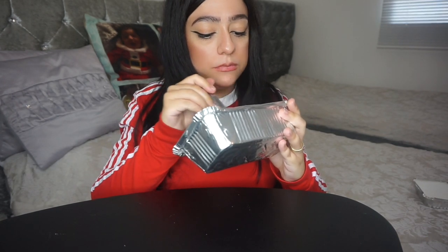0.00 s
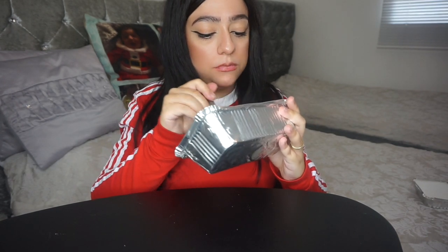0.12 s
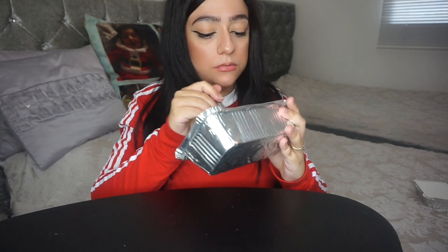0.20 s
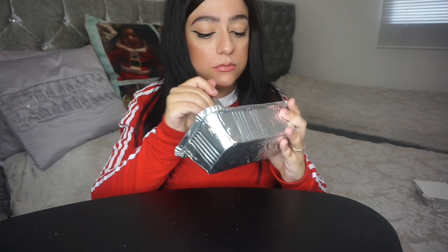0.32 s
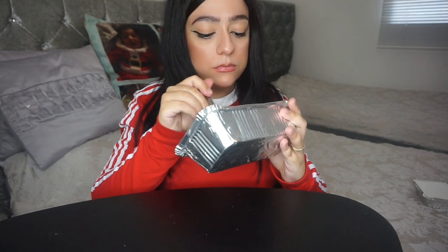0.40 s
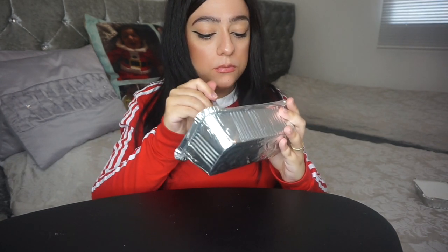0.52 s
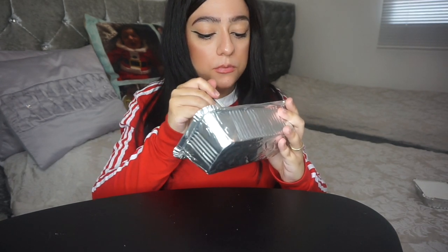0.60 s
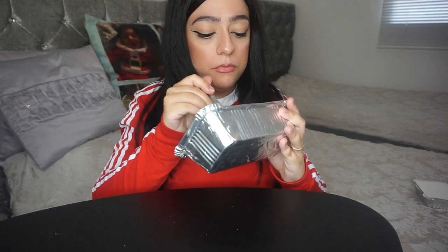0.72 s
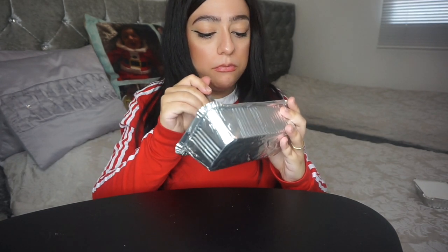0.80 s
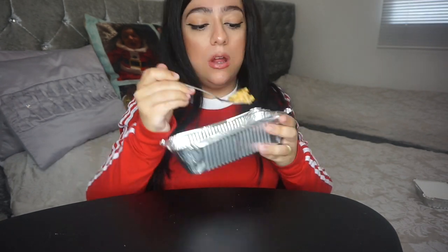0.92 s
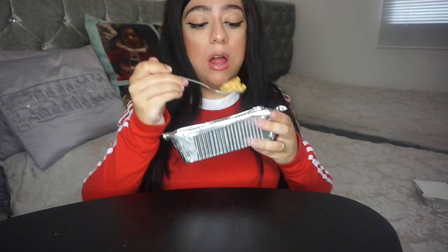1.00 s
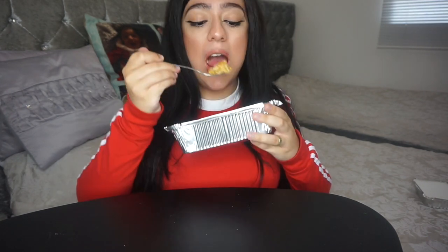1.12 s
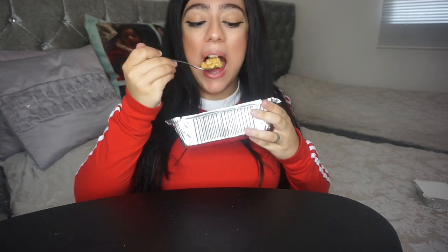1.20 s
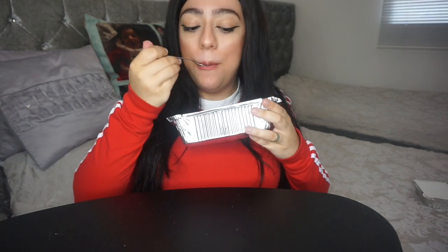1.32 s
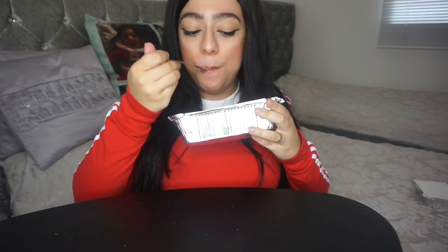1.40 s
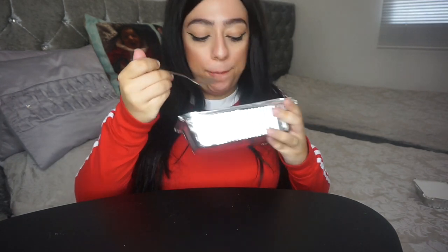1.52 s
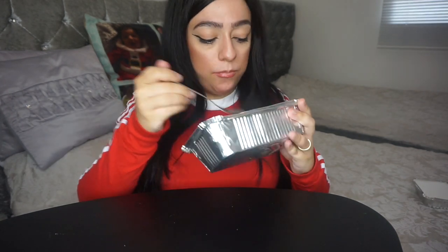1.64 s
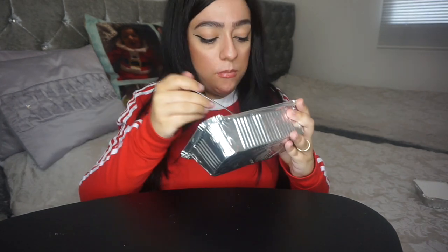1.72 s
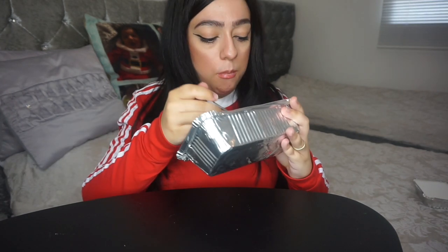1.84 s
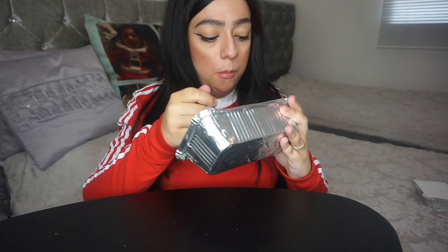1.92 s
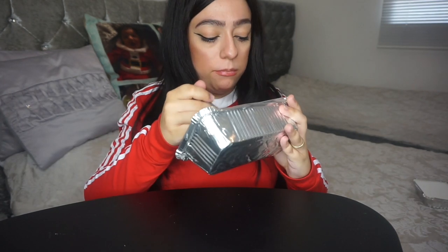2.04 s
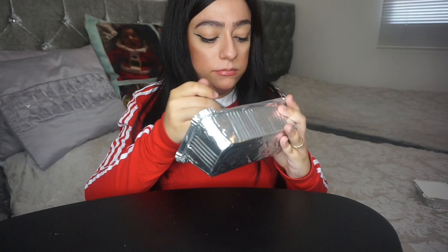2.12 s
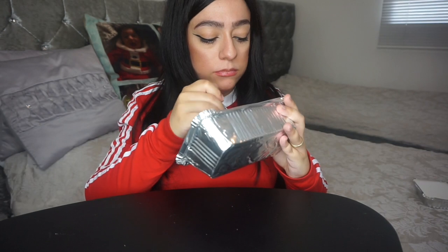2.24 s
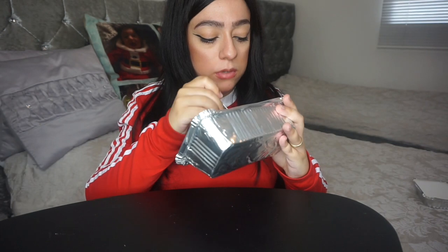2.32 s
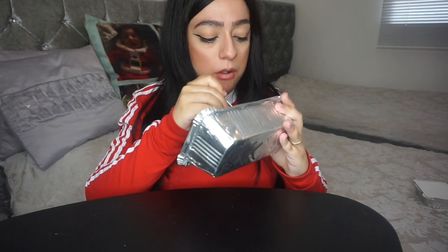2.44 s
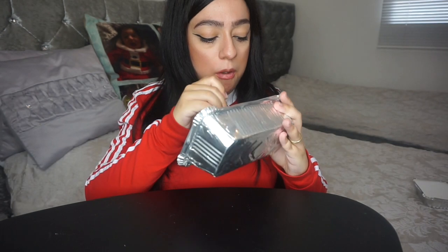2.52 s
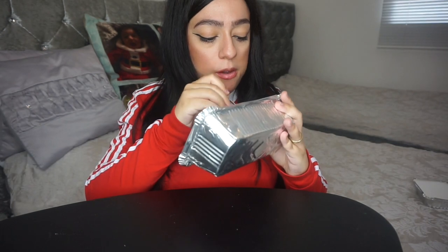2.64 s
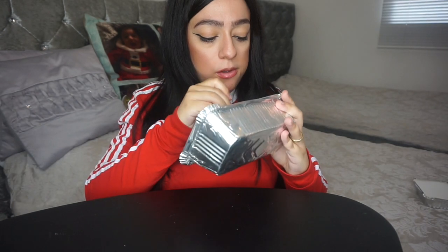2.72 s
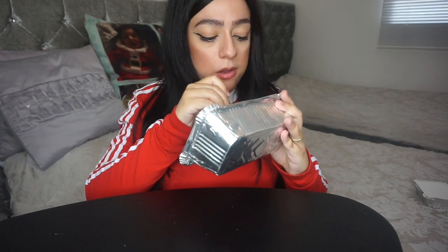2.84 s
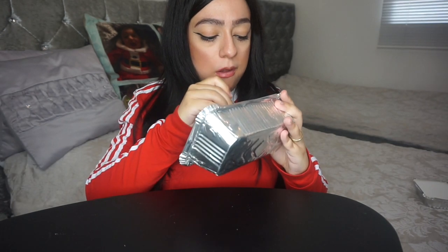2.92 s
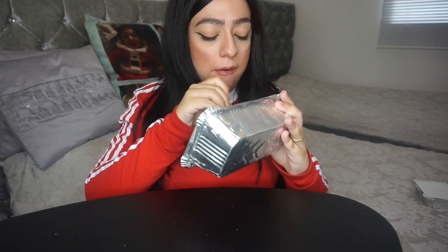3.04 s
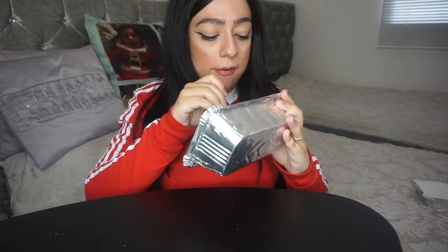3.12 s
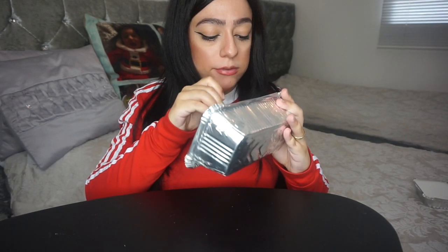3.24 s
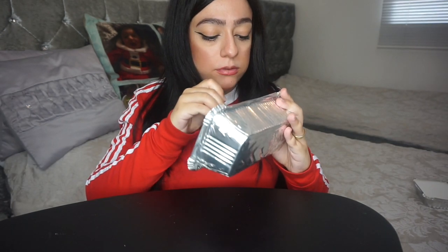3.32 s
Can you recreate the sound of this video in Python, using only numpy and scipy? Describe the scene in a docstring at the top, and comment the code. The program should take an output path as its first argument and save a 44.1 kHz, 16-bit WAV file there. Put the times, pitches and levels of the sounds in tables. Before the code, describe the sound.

A metal fork knocks and scrapes inside a thin foil tray, a busy cluster first, then a soft rub and a long pause, then spaced scoops; close stereo microphone in a small furnished room.

```python
"""Fork tines scrape and knock inside a hand-held aluminium foil tray, in a small furnished room.
Scrapes are clumps of stick-slip clicks and knocks are brief crushes; both drive resonances of the thin foil.
Between two scoops a band of noise rubs as the fork is drawn out with a mouthful, and the hand takes a new grip.
Moist food ticks now and then, and two lone tones ring out of the tray. The direct sound sits a little
to the right of the stereo microphone, with a short room ring, a dull late tail and quiet steady air."""
import sys
import numpy as np
from scipy import signal
from scipy.fft import rfft, irfft
from scipy.io import wavfile
from scipy.ndimage import map_coordinates

SR = 44100
rng = np.random.default_rng(int(sys.argv[2]) if len(sys.argv) > 2 else 0)


def transcribe(u):
    """Save the signal u as a 16-bit wav file named by the first command-line argument.

    u: samples, shape (n,) or (channels, n), limited to [-1, 1]; the rate is SR.
    q: integer samples, one column per channel.
    """
    v = np.clip(np.atleast_2d(u).T, -1, 1)
    q = np.round(v * 32767).astype(np.int16)
    wavfile.write(sys.argv[1], SR, q)


N = 147735   # length in samples
SIZE = 16384   # samples given to one contact
CUTOFF_HZ = 15750

# Steady air of the room. Each row: frequency in Hz, level in dB.
AIR_SPECTRUM = [(25,-6.5), (50,-4), (300,4), (1100,-5), (1800,-4.5), (3000,-13), (7000,-18), (16000,-16)]
AIR_DB, AIR_SIDE_DB = -55, -11   # the side level is relative to the middle

# Tone of the reverberation in the middle. Each row: frequency in Hz, gain in dB.
ROOM_COLOUR = [(150, -3.5), (1000, -4.5), (3000, -5), (6000, 7.5), (14000, -4)]
# Tone of the reverberation at the sides. Each row: frequency in Hz, gain in dB.
SIDE_COLOUR = [(200,-8.5), (1000,-4), (3000,-2.5), (5500,11), (9000,2), (15000,-9)]
# Balance at the microphone. Each row: frequency in Hz, left over right in dB.
LEFT_OVER_RIGHT = [(200,-0.3), (600,-2.5), (5000,-2), (12000,0.1)]
RIGHT_LAG_S = .000007
ROOM_GAP_S = 0.00535   # silence before the first reflection
ROOM_T60_S, ROOM_DB = 0.25, -7   # short ring, before its colour
LATE_T60_S, LATE_DB = 0.77, -10   # late tail, before damping and colour
LATE_DAMPING_HZ = 2500   # bedding soaks up the treble of the late tail
SWAY_HZ = 4   # the tray moves in the hand

# Small sticky ticks of food. Each row: start in seconds, level in dB.
FOOD_TICKS = [(.052,-44.5), (1.183,-43), (1.5085,-44.5), (3.162,-46)]
TICK_HZ = 12800

# The fork rubs as it is drawn out with the food. One row: release in seconds, swell in dB, level in dB.
RUB_STROKE = (0.065, 9.4, -24)
# Spectrum of the rub. Each row: frequency in Hz, gain in dB.
RUB_SPECTRUM = [(80,-48), (250,-15.5), (380,-4.5), (540,2.5), (950,2), (1400,-9), (2900,-7), (8200,-27.5),
                (12500,-17.5), (16000,-24)]
# Resonances in the rub. Each row: frequency in Hz, width in Hz, boost in dB.
RUB_RINGS = [(1504, 18, 16.7), (2830, 54, 4.1), (4300, 140, 3.9), (950, 70, 1.7)]
RUB_START_S, RUB_RISE_S = 1.0455, .042

# A thin metallic ring after a hard tap, and a boom of the tray's floor.
# Each row: start in seconds, frequency in Hz, fall by 60 dB in seconds, level in dB.
LONG_RINGS = [(.32, 1402, 0.35, -34), (1.98, 221.4, 0.35, -35)]
RING_ATTACK_S = .012

# Registers in which a contact is levelled: bass, middle, rattle, treble. Each row: lowest Hz, highest Hz.
REGISTERS_HZ = [(150, 760), (760, 1380), (1500, 4500), (5200, 16000)]
# The tines knock on the foil. Each row: start in seconds, bass, middle, rattle and treble levels in dB,
# pitch of the crease (the bite) in Hz.
KNOCKS = [(.196,-28,-36,-30.5,-46,2840), (.2005,-29.5,-31,-29.5,-52,1900), (.261,-40,-65,-26.5,-27,4000),
          (.3198,-25,-21,-24,-40,3180), (.3265,-31,-21,-22.5,-73,1930), (.539,-36,-24,-26,-27,3640),
          (.6116,-29.5,-41,-20.5,-30.5,3200), (.6219,-37,-28,-23.5,-37,3360),
          (.6378,-37,-31,-21.5,-37,3180), (.6491,-28,-20,-17,-36,2910), (.677,-34.5,-38,-26,-59,2900),
          (.829,-68,-73,-45.5,-64,1900), (.897,-51,-48.5,-64,-65,1800), (1.005,-49.5,-51,-55,-80,2210),
          (1.9799,-38.5,-33.5,-37.5,-54,3780), (2.253,-40,-31,-36,-48,2950),
          (2.2887,-40,-45,-32.5,-53,3360), (2.3213,-32.5,-33,-31,-39,3380),
          (2.3335,-35.5,-30.5,-31.5,-47,2340), (2.5306,-34.5,-50,-27,-54,3030),
          (2.5704,-32,-34,-28.5,-43,3200), (2.7963,-36.5,-52,-39.5,-46,2870),
          (2.8127,-31,-35.5,-32,-43.5,3660), (2.8251,-40,-24,-31,-42.5,2560),
          (3.034,-28.5,-35.5,-30,-40,3900), (3.0399,-27,-18.5,-27,-39.5,3700),
          (3.043,-33.5,-20,-31.5,-53,3950), (3.3448,-45.5,-39.5,-38.5,-43.5,2880)]
# The tines scrape. Each row: start in seconds, push in seconds, release in seconds, swell in dB
# (negative sinks instead), bass, middle, rattle and treble levels in dB, pitch of the crease in Hz.
SCRAPES = [(-.01,0.0099,0.13,-19.5,-38.5,-38.5,-35.5,-39,2580),
           (.21,0.071,0.11,5,-47.5,-39.5,-37.5,-45,3750), (.54,0.13,0.061,6,-30.5,-25,-29.5,-38.5,2950),
           (1.981,0.058,0.08,-1.5,-39,-37,-40,-45,2830), (2.255,0.07,0.083,9.5,-41,-39.5,-38,-51.5,2440),
           (2.539,0.04,0.091,-1,-33.5,-35,-32.5,-43,3160), (2.799,0.031,0.086,15,-36,-32.5,-34,-46,2800),
           (3.04,0.044,0.072,2,-40,-31.5,-35,-45.5,3700)]
# Resonances of the tray. Each row: frequency in Hz, width in Hz, boost in the first grip in dB,
# boost in the second grip in dB.
TRAY_MODES = [(220.4,26,16,5.5), (316.6,34,8.5,-1.5), (386.7,63,15,1.5), (518.6,12.5,12.5,1), (572,130,4,4),
              (767,34,8,0.5), (878,36,7,6.5), (1012,36,0,8), (1082,48,8.5,7), (1212,33,6,13),
              (1390,78,3,-15), (1930,81,5.5,1)]
# Broad response of the foil. Each row: frequency in Hz, gain in dB.
FOIL_RESPONSE = [(60,-34.5), (130,-13), (230,-6), (550,0), (1100,0), (2300,-1), (3600,-5), (4600,-12.5),
                 (6200,-19), (13500,-10.5), (16000,-18.5)]
REGRIP_S = 1.5   # contacts from here on meet the second grip
FLEX = .012   # the foil bends: random shift of its resonances at each touch, as a share of the pitch
SHEET_T60_S, SHEET_DB = 0.067, -2   # dense shimmer of the whole sheet, before the foil response
KNOCK_LENGTH_S = 0.0065   # span over which the level of a knock is reckoned
CRUSH_S, CRUSH_DB = 0.0017, 2   # nominal decay time constant of the crackle, level against the click
BITE_WIDTH_HZ, KNOCK_BITE_DB, SCRAPE_BITE_DB = 320, 12, 2.5
SLIPS_PER_S, SLIP_SPREAD_DB = 2600, 2.5
CATCH_S, CATCH_DB = 0.00668, 2.5   # the tines catch on the ribs and run free again


def from_db(db):
    """Decibels to gain."""
    return 10 ** (np.asarray(db) / 20)


def unit(x):
    """Scale to an energy of one."""
    return x / np.sqrt(np.sum(x ** 2) + 1e-20)


def add(out, start_s, x):
    """Mix x in at start_s; whatever falls before the opening is cut off."""
    start = int(round(start_s * SR))
    x = x[max(-start, 0):]
    start = max(start, 0)
    out[start:start + len(x)] += x[:max(N - start, 0)]


def colour(x, points):
    """Causal (minimum-phase) filter through (Hz, dB) points."""
    hz, db = np.transpose(points)
    bins_hz = np.fft.rfftfreq(4096, 1 / SR)
    gain_db = np.interp(np.log(bins_hz + 1), np.log(hz), db)
    # folding the cepstrum onto positive time gives the minimum phase
    cepstrum = irfft(np.log(from_db(gain_db))) * np.r_[1, np.full(2047, 2), 1, np.zeros(2047)]
    impulse_response = irfft(np.exp(rfft(cepstrum)))
    return signal.fftconvolve(x, impulse_response)[:len(x)]


def resonate(x, hz, width_hz, boost_db):
    """Lift (or lower) one resonance in a broad sound with a two-pole band filter."""
    r = np.exp(-np.pi * abs(width_hz) / SR)
    b = np.array([1, 0, -1]) * (1 - r * r) / 2
    a = [1, -2 * r * np.cos(2 * np.pi * hz / SR), r * r]
    band = signal.lfilter(b, a, x + 1e-18)
    return x + (from_db(boost_db) - 1) * band


def dying_noise(t60, gap=0, size=SIZE):
    """Noise of near-even spectrum that starts after a gap and dies away in nominally t60; energy one."""
    t = np.arange(size) / SR
    fade = from_db(-60 * t / t60) * (t >= gap)
    spectrum = rfft(rng.standard_normal(size) * fade ** .8, 2 * size)
    flattened = irfft(spectrum / (abs(spectrum) + 1e-20))[:size]
    return unit(flattened * fade ** .3)


def stroke(push, release, swell_db):
    """Pressure of one stroke: it moves by swell_db over the push, then falls by 20 dB over the release."""
    t = np.arange(SIZE) / SR
    return from_db(np.where(t < push, swell_db * (t / push - 1), -20 * (t - push) / release))


def room_tone():
    """Quiet steady air: coloured noise, with a weaker independent noise at the sides."""
    mid = unit(colour(rng.standard_normal(N), AIR_SPECTRUM)) * np.sqrt(N)
    side = unit(colour(rng.standard_normal(N), AIR_SPECTRUM)) * np.sqrt(N)
    return from_db(AIR_DB) * (mid + from_db(AIR_SIDE_DB) * side * np.array([[1], [-1]]))


def reverberation(x, points):
    """A short room ring and a dull late tail; the reflections keep changing as the tray moves in the hand."""
    out = 0
    angle = 2 * np.pi * SWAY_HZ * np.arange(N) / SR
    damping = signal.butter(1, LATE_DAMPING_HZ, fs=SR)
    # the sound moves between two independent sets of reflections
    for share in (np.cos(angle), np.sin(angle)):
        late = signal.lfilter(*damping, dying_noise(LATE_T60_S, ROOM_GAP_S, size=SR))
        early = dying_noise(ROOM_T60_S, ROOM_GAP_S, size=SR)
        tail = from_db(ROOM_DB) * early + from_db(LATE_DB) * late
        out = out + signal.fftconvolve(x * share, colour(tail, points))[:N]
    return out


def room(x):
    """Direct sound, a little to the right by level, with the right channel arriving a fraction of a sample
    later, and the room around it."""
    mid = x + reverberation(x, ROOM_COLOUR)
    side = reverberation(x, SIDE_COLOUR)
    left = colour(mid + side, [(hz, db / 2) for hz, db in LEFT_OVER_RIGHT])
    right = colour(mid - side, [(hz, -db / 2) for hz, db in LEFT_OVER_RIGHT])
    # a lag of less than one sample needs interpolation
    right = map_coordinates(right, [np.arange(N) - RIGHT_LAG_S * SR], order=3)
    return np.array([left, right])


def sticky_ticks():
    """Tiny bright ticks of moist food, each ringing for a few cycles."""
    out = np.zeros(N)
    b, a = signal.iirpeak(TICK_HZ, 2, fs=SR)
    once = signal.lfilter(b, a, signal.unit_impulse(SIZE) + 1e-18)
    tick = unit(signal.lfilter(b, a, once))
    for start_s, db in FOOD_TICKS:
        add(out, start_s, tick * np.sqrt(KNOCK_LENGTH_S * SR / 2) * from_db(db))
    return out


def mouthful():
    """A short smooth rub as the fork is drawn out: noise under one stroke, coloured and resonated."""
    release, swell_db, level_db = RUB_STROKE
    friction = rng.standard_normal(SIZE) * stroke(RUB_RISE_S, release, swell_db)
    x = colour(friction, RUB_SPECTRUM)
    for hz, width_hz, boost_db in RUB_RINGS:
        x = resonate(x, hz, width_hz, boost_db)
    out = np.zeros(N)
    add(out, RUB_START_S, unit(x) * np.sqrt(RUB_RISE_S * SR) * from_db(level_db))
    return out


def long_rings():
    """Single modes that are left free after a contact and ring out as decaying sines."""
    out, t = np.zeros(N), np.arange(SIZE) / SR
    for start_s, hz, t60, db in LONG_RINGS:
        envelope = np.minimum(t / RING_ATTACK_S, 1) * from_db(db - 60 * t / t60)
        add(out, start_s, np.sin(2 * np.pi * hz * t) * envelope)
    return out


def crush(bite_hz):
    """Force of one brief contact: a click and a fast crackle, ringing at the pitch of the crease hit."""
    crackle = dying_noise(CRUSH_S * np.log(1000))   # time constant to a 60 dB fall
    force = signal.unit_impulse(SIZE) + from_db(CRUSH_DB) * crackle
    return resonate(force, bite_hz, BITE_WIDTH_HZ, KNOCK_BITE_DB)


def slips(push, release, swell_db):
    """Force of a scrape: stick-slip clicks of random sign and size, clumped by the ribs, under one stroke."""
    t = np.arange(SIZE) / SR
    clicks = (rng.random(SIZE) < SLIPS_PER_S / SR) * rng.choice([-1, 1], SIZE)
    sizes_db = SLIP_SPREAD_DB * np.minimum(rng.exponential(1, SIZE), 4)
    catch_db = CATCH_DB * np.interp(t / CATCH_S, np.arange(SIZE), rng.standard_normal(SIZE))
    return clicks * from_db(sizes_db + catch_db) * stroke(push, release, swell_db)


def tray(force, start_s, length_s, levels_db):
    """The foil rings under a force; the spot touched sets the level of each register."""
    shimmer = signal.fftconvolve(force, dying_noise(SHEET_T60_S))[:SIZE]
    x = colour(force + from_db(SHEET_DB) * shimmer, FOIL_RESPONSE)
    for hz, width_hz, first_db, second_db in TRAY_MODES:
        bent_hz = hz * (1 + FLEX * rng.standard_normal())
        x = resonate(x, bent_hz, width_hz, first_db if start_s < REGRIP_S else second_db)
    hz = np.fft.rfftfreq(SIZE, 1 / SR)
    power = 2 * abs(rfft(x)) ** 2 / (SIZE * length_s * SR)
    points = []
    for (lo, hi), db in zip(REGISTERS_HZ, levels_db):
        gain_db = db - 10 * np.log10(power[(hz > lo) & (hz < hi)].sum() + 1e-20)
        points += [(lo * 1.2, gain_db), (hi / 1.15, gain_db)]   # the gaps between let the gain glide
    return colour(x, points)


def fork_on_foil():
    """Knocks and scrapes of the tines, each a force that drives the tray."""
    out = np.zeros(N)
    for start_s, *levels_db, bite_hz in KNOCKS:
        add(out, start_s, tray(crush(bite_hz), start_s, KNOCK_LENGTH_S, levels_db))
    for start_s, push, release, swell_db, *levels_db, bite_hz in SCRAPES:
        force = resonate(slips(push, release, swell_db), bite_hz, BITE_WIDTH_HZ, SCRAPE_BITE_DB)
        add(out, start_s, tray(force, start_s, push, levels_db))
    return out


def scene():
    """Fork, tray and food in the room, over its quiet air."""
    sources = sticky_ticks() + mouthful() + long_rings() + fork_on_foil()
    return room_tone() + room(sources)


def record(dry):
    """The top is cut steeply by an elliptic low-pass."""
    low_pass = signal.ellip(12, .1, 80, CUTOFF_HZ, fs=SR, output="sos")
    return signal.sosfilt(low_pass, dry)


dry = scene()
out = record(dry)
transcribe(out)
```